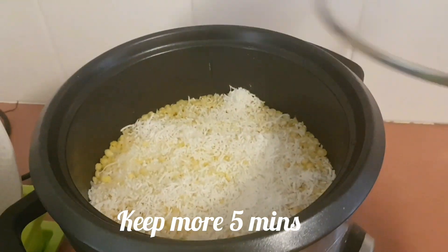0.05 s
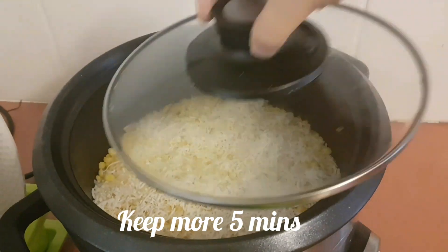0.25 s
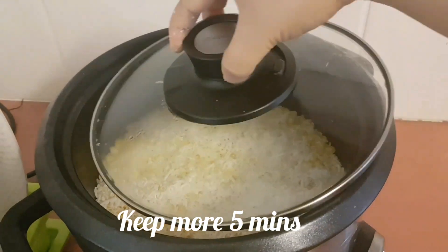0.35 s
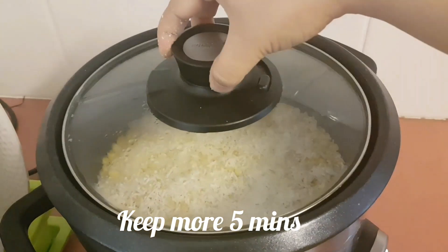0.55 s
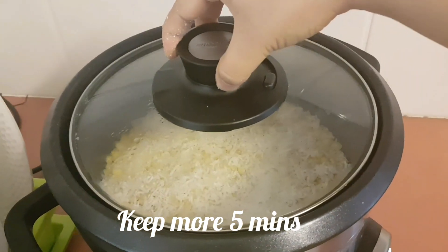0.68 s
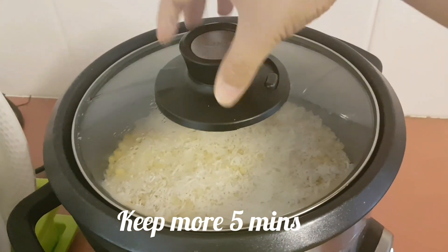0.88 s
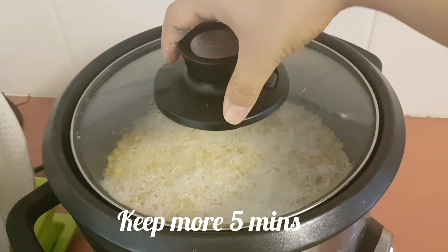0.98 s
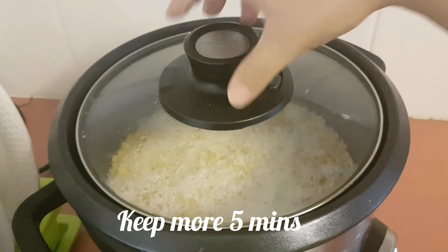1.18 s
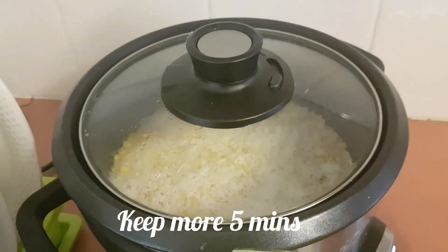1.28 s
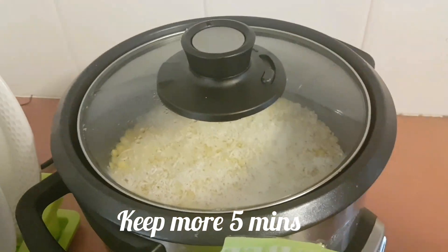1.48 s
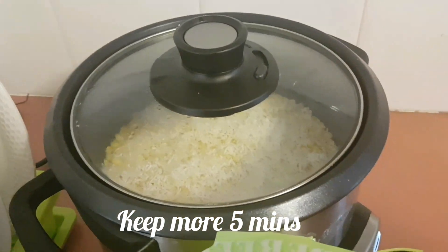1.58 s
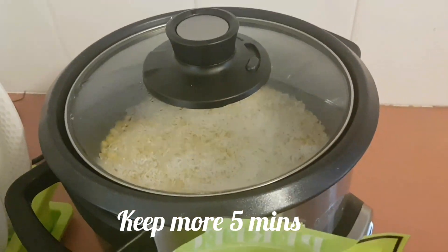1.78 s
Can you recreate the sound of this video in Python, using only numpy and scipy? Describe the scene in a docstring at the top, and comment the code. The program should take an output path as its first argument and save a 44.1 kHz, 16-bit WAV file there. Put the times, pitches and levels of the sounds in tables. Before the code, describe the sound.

In a small kitchen, a steel-rimmed glass lid is set on a rice cooker with a knock, a clink and a short settling rattle. Fingers shift softly on the knob, and something hollow is bumped close by.

```python
"""Glass lid on a rice cooker

A steel-rimmed glass lid knocks, clinks against the pot and rocks into its seat. Fingers shift on
the knob and let go, then something hollow is bumped nearby. Each impact excites damped normal modes:
the sparse ones ring as tones, the dense ones as noise. A small kitchen reverberates, over faint hiss."""
import sys
import numpy as np
from scipy import signal
from scipy.fft import rfft, irfft
from scipy.io import wavfile

SR = 44100
rng = np.random.default_rng(int(sys.argv[2]) if len(sys.argv) > 2 else 0)


def materialize(psi):
    """Save the field psi as 16-bit PCM at rate SR to the path in sys.argv[1].

    A 1-D psi becomes a single channel; in a 2-D psi each row is a channel.
    """
    bounded = np.clip(np.atleast_2d(psi).T, -1, 1)
    quanta = np.round(bounded * 32767).astype(np.int16)
    wavfile.write(sys.argv[1], SR, quanta)


N = 81585
LEFT_LAG_S = .0002


def undb(db):
    """Amplitude ratio of a level."""
    return 10 ** (np.asarray(db) / 20)


def pan(db):
    """Interaural level difference: two gains, the left db above the right."""
    return undb(np.array([[db], [-db]]) / 2)


def noise(spectrum, size=N, spread_hz=1370):
    """Spectral shaping: stereo noise of unit rms whose interaural coherence falls with frequency."""
    f = np.maximum(np.fft.rfftfreq(size, 1 / SR), 1)
    hz, db = np.array(spectrum).T
    gain = undb(np.interp(np.log(f), np.log(hz), db))
    apart = f / (f + spread_hz)
    mid, side = rfft(rng.standard_normal((2, size)))
    ears = mid * np.sqrt(2 - apart) + side * np.sqrt(apart) * np.array([[1], [-1]])
    delay = np.exp(-2j * np.pi * f * np.array([[LEFT_LAG_S], [0]]))
    x = irfft(gain * delay * ears, size)
    return x / x.std()


def envelope(rise_ms, t60, size=16384):
    """Damping: a linear rise, then exponential decay by 60 dB in t60 seconds."""
    t, rise = np.arange(size) / SR, rise_ms / 1000
    return np.clip(t / rise, 0, 1) * np.exp(-np.log(1000) * np.maximum(t - rise, 0) / t60)


def burst(spectrum, start, rise_ms, t60, db):
    """Modal overlap: many close modes dying together merge into decaying noise."""
    out, first = np.zeros((2, N)), int(start * SR)
    fade = envelope(rise_ms, t60)
    x = undb(db) * noise(spectrum, len(fade)) * fade
    out[:, first:first + len(fade)] = x[:, :N - first]
    return out


def ring(modes, start, rise_ms, db):
    """Modal superposition: damped sinusoids, varying a little in pitch and level at each blow."""
    out, first = np.zeros((2, N)), int(start * SR)
    span = slice(first, min(N, first + SR // 4))
    t = np.arange(N)[span] / SR - start
    swell = np.clip(t / (rise_ms / 1000), 0, 1)
    for k, (hz, mode_db, t60, pan_db) in enumerate(modes):
        detune, scatter_db = rng.normal(0, [.001, .5])
        lag_rad = np.array([[min(2 * np.pi * hz * LEFT_LAG_S, .8)], [0]])
        wave = (-1) ** k * np.sin(2 * np.pi * hz * (1 + detune) * t - lag_rad)
        decay = np.exp(-np.log(1000) * t / t60)
        out[:, span] += undb(db + mode_db + scatter_db) * pan(pan_db) * wave * swell * decay
    return out


# Spectrum of the room noise: f/Hz, relative level/dB
HISS_SPECTRUM = [(20, -8), (50, -2), (115, 1.5), (180, -8), (380, -8), (510, -2.5), (680, -11), (830, -6.5),
                 (1100, -8.5), (1800, -7), (2400, -4.5), (3500, -11.5), (5500, -16), (8300, -16),
                 (9100, -29.5), (13000, -24), (16000, -29.5)]

def hiss(level_db=-46.5, waver_db=.35):
    """Random amplitude modulation: quiet room noise wavers slightly."""
    waver = np.interp(np.arange(N), np.linspace(0, N, 40), rng.standard_normal(40))
    return noise(HISS_SPECTRUM) * undb(level_db + waver_db * waver)


def kitchen(x, t60=.22, level_db=-10, gap_s=.0087):
    """Reverberation: diffuse reflections from tiled walls follow the direct sound."""
    fade = envelope(8.2, t60)
    tail = noise([(20, 0), (16000, 0)], len(fade)) * fade
    tail /= np.sqrt((tail ** 2).sum() / 2)
    tail = np.pad(tail, ((0, 0), (int(gap_s * SR), 0)))
    return x + undb(level_db) * signal.fftconvolve(x, tail, axes=1)[:, :N]


# Spectrum of a crinkle: f/Hz, relative level/dB
CRINKLE_SPECTRUM = [(3000, -28), (8000, -9), (11000, -9), (13500, 0), (16000, -4)]
# Handling scratches: t/s, level/dB
CRINKLE_EVENTS = [(.050, -57), (1.050, -55), (1.395, -45), (1.677, -41.5)]

def crinkles():
    """Friction noise: handling makes thin, airy scratches."""
    return sum(burst(CRINKLE_SPECTRUM, start, rise_ms=5, t60=.078, db=db) for start, db in CRINKLE_EVENTS)


# Low, middle and high spectra of an impact: f/Hz, relative level/dB
THUD_SPECTRUM = [(40, -32), (80, -6), (125, -13), (260, -19), (480, -6.5), (720, -11.5), (1000, -21.5),
                 (2000, -44), (16000, -76)]
CLACK_SPECTRUM = [(100, -16), (400, 10), (750, 1), (1200, 1), (2100, 5.5), (3000, -1.5), (4500, -10),
                  (8000, -23), (16000, -68)]
TICK_SPECTRUM = [(300, -31), (1500, 9.5), (3500, -0.5), (5500, 3.5), (8300, 2), (9100, -10.5),
                 (13000, -8.5), (16000, -15)]

def contact(start, rise_ms, thud_db, clack_db, tick_db):
    """Impact excitation: hard bodies meet with a dull thud, a clack and a tick that shimmers on."""
    thud = burst(THUD_SPECTRUM, start, rise_ms, t60=.1, db=thud_db)
    clack = burst(CLACK_SPECTRUM, start, rise_ms, t60=.085, db=clack_db)
    tick = burst(TICK_SPECTRUM, start, rise_ms, t60=.036, db=tick_db)
    shimmer = burst(TICK_SPECTRUM, start, rise_ms, t60=.13, db=tick_db - 7.5)
    return pan(-2.5) * thud + pan(-3) * clack + pan(-1) * (tick + shimmer)


# Spectrum of rubbing: f/Hz, relative level/dB
RUSTLE_SPECTRUM = [(100, -29), (500, -23.5), (1100, -3.5), (1800, 3.5), (2700, -0.5), (4000, -6.5),
                   (7000, -32), (16000, -23.5)]
# Touches of the hand and things nearby:
# t/s, rise/ms, T60/s, bump level/dB, centre f/Hz, rustle level/dB, tick level/dB
SOFT_CONTACTS = [(.050, 17, 0.057, -54.5, 386, -46, -47), (0.151, 12, 0.028, -63, 300, -39, -70),
                 (0.228, 15, 0.14, -43, 400, -34.5, -81), (.645, 9, 0.24, -38.5, 740, -43.5, -53),
                 (.718, 13.3, 0.07, -38, 179, -65, -70), (.731, 9.3, 0.094, -40.5, 650, -35, -46),
                 (0.823, 3.7, 0.07, -48.5, 141, -64, -46), (.968, 3.4, 0.35, -45.5, 710, -49, -74),
                 (1.005, 12, 0.1, -29.5, 427, -39.5, -48.5), (1.014, 4, 0.092, -35, 159, -37.5, -62),
                 (1.052, 6, 0.11, -51, 497, -39.5, -45.5), (1.119, 3, 0.16, -50.5, 142, -40.5, -49),
                 (1.134, 2.67, 0.1, -31, 98, -52, -54), (1.22, 6.4, 0.16, -48.5, 140, -43, -69),
                 (1.251, 5.6, 0.25, -36.5, 666, -36.5, -46.5), (1.373, 4.7, .11, -32.5, 620, -32, -44),
                 (1.393, 5.5, 0.15, -40, 576, -37.5, -48), (1.540, 14.6, 0.3, -39.5, 467, -36.5, -46.5),
                 (1.698, 7.5, 0.2, -74, 595, -42.5, -47), (1.774, 16, 0.091, -47.5, 446, -43.5, -69)]

def bumps(width_oct=.53, skirt_db=10.5):
    """Damped resonance: each soft contact excites one broad peak, with a rustle and a tick on top."""
    out, f = np.zeros((2, N)), np.geomspace(20, 20000, 60)
    for start, rise_ms, t60, bump_db, centre_hz, rustle_db, tick_db in SOFT_CONTACTS:
        widths_away = np.log2(f / centre_hz) / width_oct
        peak = np.column_stack([f, -skirt_db * np.hypot(1, widths_away)])
        for spectrum, db in (peak, bump_db), (RUSTLE_SPECTRUM, rustle_db), (TICK_SPECTRUM, tick_db):
            out += burst(spectrum, start, rise_ms, t60, db)
    return out


# Modes of the hollow object: f/Hz, level/dB, T60/s, left minus right/dB
BODY_MODES = [(403, -14, .13, -5), (510, -6, .1, -1), (565, 0, .06, 3)]
SHELL_MODES = [(1092, 0, .14, -4), (1170, -8, .08, 0), (1890, -4, .08, 3), (2290, -4, .08, 0),
               (3025, -2, .06, -3), (4400, -11, .06, 0), (8130, -16, .06, -2)]
# Blows on it: t/s, contact/ms, then level/dB of body, shell, thud, clack, tick
HOLLOW_IMPACTS = [(1.5622, 7.7, -12, -30.5, -40, -25, -64), (1.6054, 9.3, -29.5, -43, -41, -26, -30),
                  (1.6150, 8, -41, -26, -41, -47, -47)]

def knocks():
    """Free vibration: a hollow object rings after a knock and its brighter rebound."""
    out = np.zeros((2, N))
    for start, rise_ms, body_db, shell_db, *contact_db in HOLLOW_IMPACTS:
        out += ring(BODY_MODES, start, rise_ms, body_db)
        out += ring(SHELL_MODES, start, rise_ms, shell_db)
        out += contact(start, rise_ms, *contact_db)
    return out


# Modes of the cooker housing, glass pane, inner pot, steel rim, the pane once seated and its final catch: #
# f/Hz, level/dB, T60/s, left minus right/dB
HOUSING_MODES = [(122, .5, .19, -1), (196, -4, .13, -3), (263, -1, .14, -1), (338, -8, .12, -2),
                 (376, -8, .11, -5), (423, -4, .09, -2), (470, -4, .1, -4)]
PANE_MODES = [(517, 1.5, .195, -4), (588, -11, .09, -5), (690, -16, .08, -2), (885, -17, .09, -1),
              (1104, -20, .15, 4), (1865, -12, .08, -4), (2300, -19, .1, -3), (2760, -24, .08, -2),
              (2930, -23, .07, -3)]
POT_MODES = [(600, -5, .13, -2), (824, -6, .13, 2), (1001, -3, .1, 4), (1170, 4, .09, 2),
             (1255, 2, .045, 2), (1824, 0, .12, -6), (2778, -10, .08, 0), (3147, -15, .11, -2),
             (3914, -16, .09, 4), (5254, -14, .07, -2), (7900, -11, .035, 0)]
RIM_MODES = [(1333, -6, .08, 0), (1402, 0, .12, 3), (2052, -5, .09, -2), (2400, -9, .1, -2),
             (4020, -15, .08, 2)]
SEAT_MODES = [(826, -6, .16, 0), (1505, 0, .15, 0), (2890, -11, .13, -4), (3020, -15, .1, 0)]
CATCH_MODES = [(515, 0, .11, -1), (640, -4, .07, 0), (840, -1, .07, 0), (930, 0, .06, 1),
               (1800, -11, .06, 0), (2000, -13, .05, 0)]
# Lid meets pot: t/s, contact/ms, then level/dB of housing, pane, pot, rim, seat, thud, clack, tick
LID_IMPACTS = [(.2468, 1.16, -17, -14, -44, -35.5, -46, -13.5, -20, -46),
               (.2700, 2.3, -37, -18, -39, -46, -49, -15.5, -26, -60),
               (.3502, 0.91, -26, -44, -23, -57, -50, -29, -17.5, -26.5),
               (0.3548, 0.67, -28.5, -37, -17.5, -22.5, -25.5, -17.5, -20, -20),
               (.3680, 1.6, -30, -44, -40, -39, -44, -37, -48, -49),
               (0.447, 8, -65, -38, -61, -23.5, -45, -32.5, -33, -37.5),
               (.4600, 2.2, -26.5, -25.5, -51, -25, -65, -24.5, -22, -35.5),
               (.4760, 8.5, -31, -16.5, -55, -35, -23, -26.5, -45, -46),
               (.5243, 7, -30, -27, -42, -35, -54, -30, -35.5, -69),
               (0.5452, 6.4, -31.5, -28, -40.5, -61, -63, -31, -40, -66),
               (0.5796, 4, -51, -33, -68, -63, -74, -44, -64, -74)]

def lid(bass_loss_hz=69):
    """Impulse response: each touch rings lid and cooker, with the deep bass thinned."""
    out = np.zeros((2, N))
    for start, rise_ms, housing_db, pane_db, pot_db, rim_db, seat_db, *contact_db in LID_IMPACTS:
        out += ring(HOUSING_MODES, start, rise_ms=3.2, db=housing_db)  # heavy, with its own rise time
        out += ring(PANE_MODES, start, rise_ms, pane_db)
        out += ring(POT_MODES, start, rise_ms, pot_db)
        out += ring(RIM_MODES, start, rise_ms, rim_db)
        out += ring(SEAT_MODES, start, rise_ms, seat_db)
        out += contact(start, rise_ms, *contact_db)
    out += ring(CATCH_MODES, start=.6455, rise_ms=.88, db=-32)  # the rim drops into place
    return signal.sosfilt(signal.butter(2, bass_loss_hz, "high", fs=SR, output="sos"), out)


def scene():
    """Superposition: all contacts sound in one room, over its hiss."""
    return kitchen(lid() + bumps() + knocks() + crinkles()) + hiss()


def record(dry, low_hz=33.2, top_hz=16000):
    """Band limiting: the microphone thins the deep bass and a steep low-pass cuts the top."""
    thin = signal.sosfilt(signal.butter(1, low_hz, "high", fs=SR, output="sos"), dry)
    return signal.sosfilt(signal.ellip(10, .2, 80, top_hz, fs=SR, output="sos"), thin)


dry = scene()
out = record(dry)
materialize(out)
```